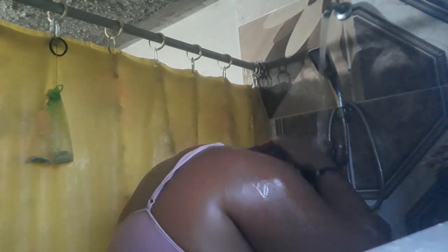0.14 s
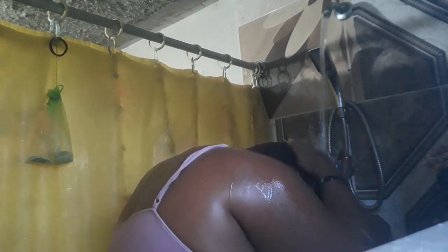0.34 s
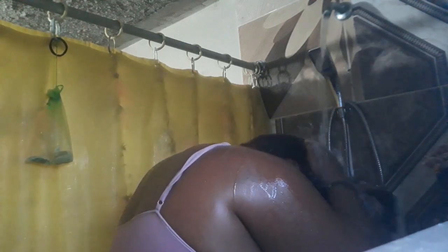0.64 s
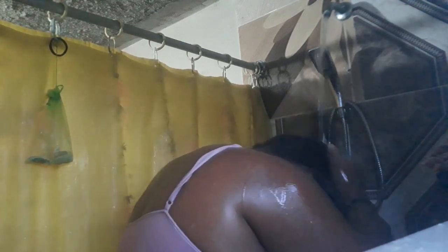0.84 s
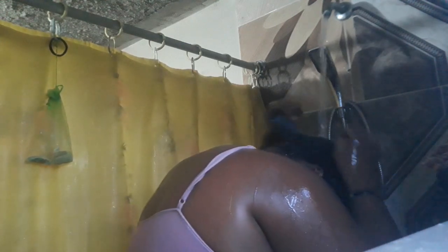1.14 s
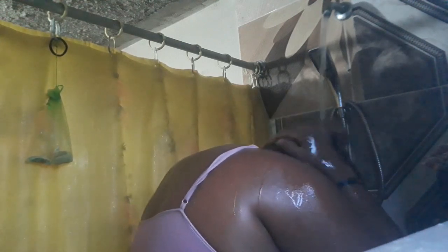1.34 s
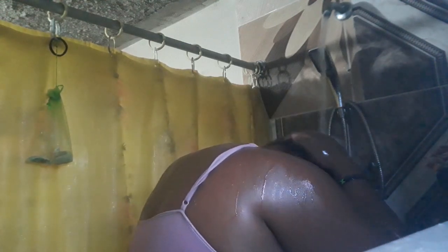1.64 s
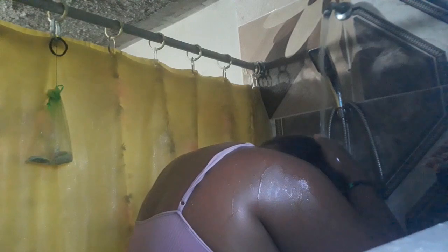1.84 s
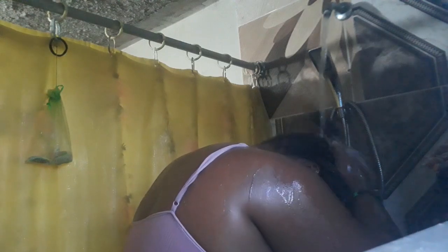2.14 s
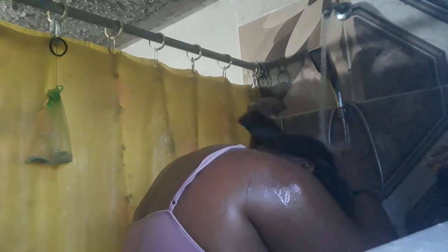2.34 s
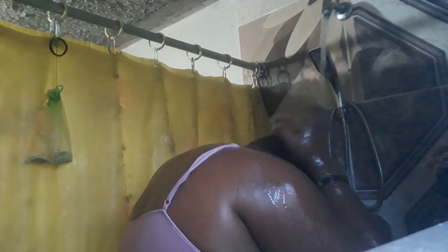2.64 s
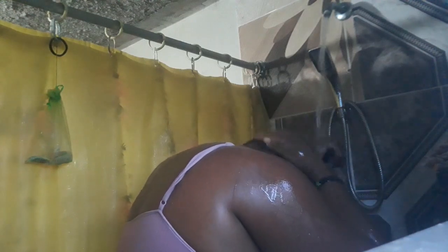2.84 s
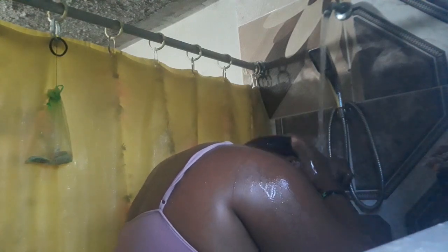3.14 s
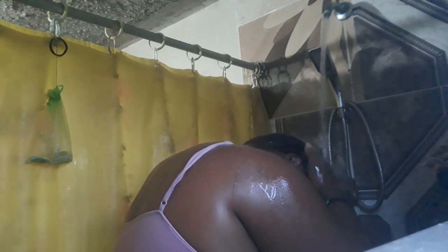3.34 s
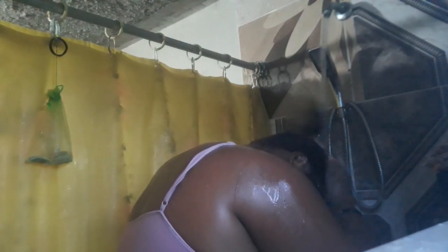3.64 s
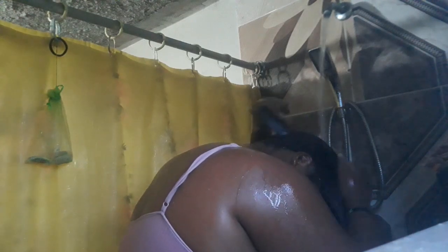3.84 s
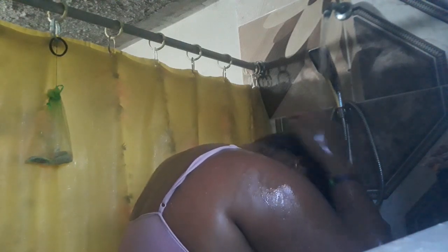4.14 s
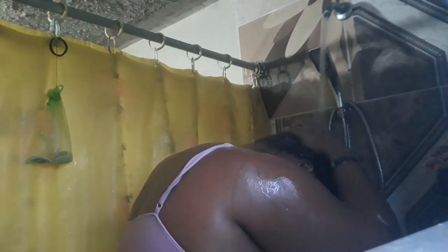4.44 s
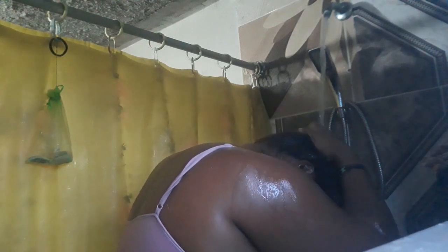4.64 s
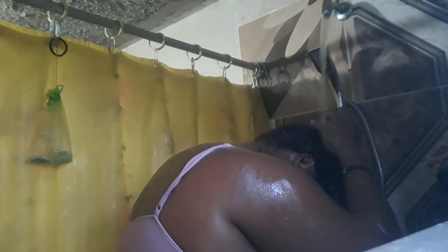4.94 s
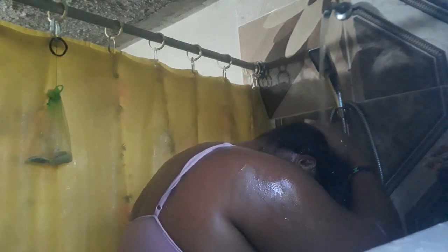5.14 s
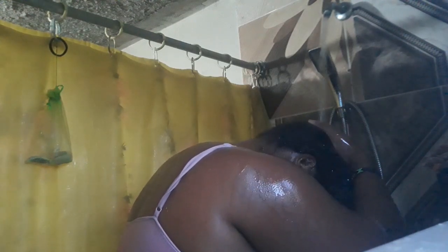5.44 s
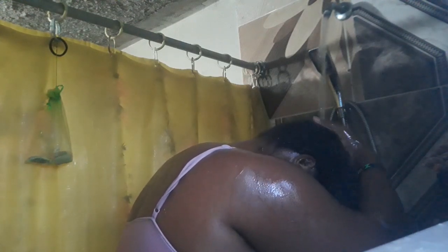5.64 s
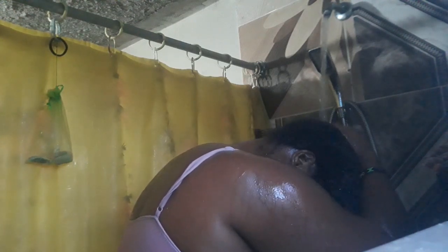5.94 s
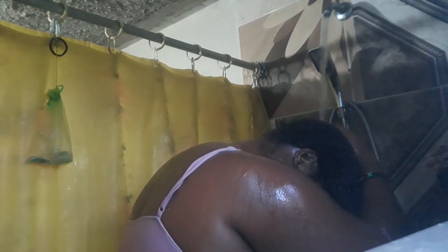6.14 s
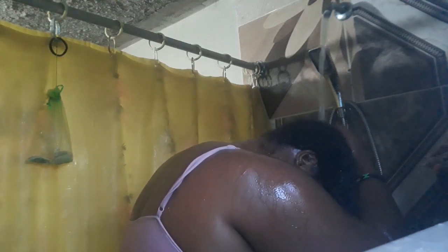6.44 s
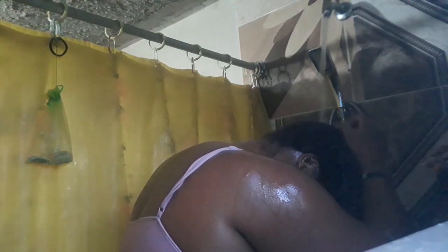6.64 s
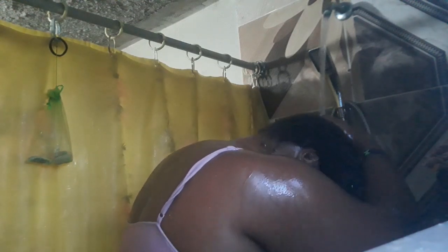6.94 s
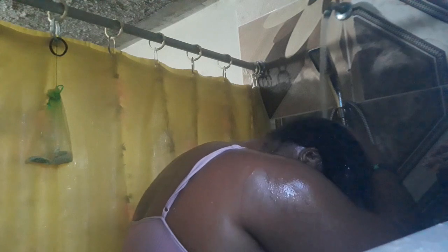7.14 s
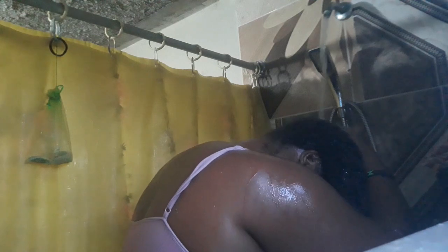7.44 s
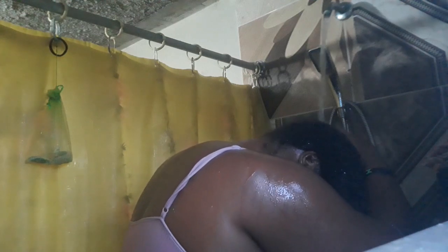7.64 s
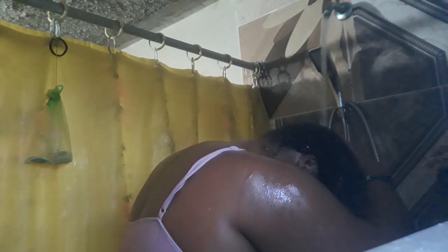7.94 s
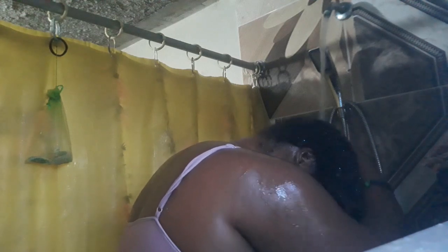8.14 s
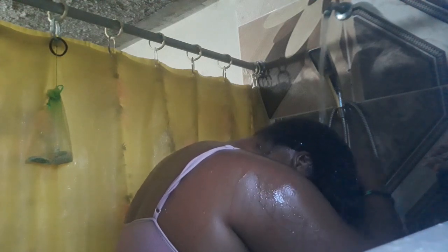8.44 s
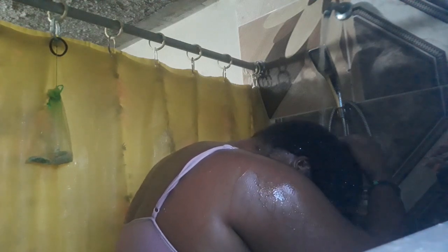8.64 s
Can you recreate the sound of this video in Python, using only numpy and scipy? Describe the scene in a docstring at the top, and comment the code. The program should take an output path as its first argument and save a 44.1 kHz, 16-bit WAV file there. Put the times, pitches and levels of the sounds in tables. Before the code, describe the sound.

A thin shower hisses in a small tiled stall while water rinsed from hair splats and spatters in uneven clumps.

```python
"""A thin shower hiss over dull drumming dips, then strengthens as hair is rinsed in a small tiled stall.
Fine drops are random impacts under slow gusts; run-off adds floor slaps and ringing trapped bubbles.
Water squeezed from the hair lands in clumps: a smack, a pitched air cavity, a bright spatter.
Noise echoes with stall resonances give the stereo space; a faint low rumble lies beneath.
Twice a dry double knock, made of damped sines, bumps softly near the microphones."""
import sys
import numpy as np
from scipy import signal
from scipy.fft import rfft, irfft
from scipy.io import wavfile
from scipy.ndimage import uniform_filter1d

SR = 44100
rng = np.random.default_rng(int(sys.argv[2]) if len(sys.argv) > 2 else 0)


def dump_mix(stems):
    """Bounce the given channels to the path in sys.argv[1] as a 16-bit WAV at rate SR."""
    frames = np.atleast_2d(stems).T  # one column per channel
    limited = np.clip(frames, -1, 1)  # hard clip at full scale
    pcm = np.round(limited * 32767).astype(np.int16)
    wavfile.write(sys.argv[1], SR, pcm)


N = 387198
TIME = np.arange(N) / SR
FFT_SIZE = 2 ** 14
BINS_HZ = np.maximum(np.arange(FFT_SIZE // 2 + 1) * SR / FFT_SIZE, 1)
MIC_LAG_SAMPLES = 20   # travel from one microphone to the other


# Fine-drop spectrum, also tints bubbles and spatter: f/Hz, relative density/dB
SPRAY_SPECTRUM = [(80, -52), (700, -37), (1500, -20.5), (2500, -6.5), (3600, 0.5), (5000, 1.5), (7300, 0.5),
                  (8100, -8), (9000, -17), (10600, -19.5), (11600, -12), (13500, -15), (16000, -19)]
# Finest-droplet spectrum: f/Hz, relative density/dB
MIST_SPECTRUM = [(1000, -50), (6000, -4), (8000, -7), (9200, -17), (10600, 2), (11700, 5), (13500, 2),
                 (16000, 0)]


def spray(level_db, mist_db=-52.5, mist_follows=0.94):
    """Fine drops tick on skin and tiles; a mist of the finest ones fizzes more evenly above them."""
    ticks = showers(level_db - 2.0 + 0.39 * drift(70), SPRAY_SPECTRUM, low_hz=3200, high_hz=12100,
                    per_s=1100, spread_db=4.0, gust_db=4.0, gust_rate_hz=70,
                    tint_db=12.0, direct_db=-6.0, count=6)
    droplets = drops(per_s=1800, spread_db=2.5)
    mist_level_db = mist_db + mist_follows * (level_db - level_db.mean()) + 2.0 * drift(30)
    mist = droplets * from_db(mist_level_db)
    return ticks + stall(mist, colour(MIST_SPECTRUM), direct_db=-4.0, lag=MIC_LAG_SAMPLES)


# Large-drop slap spectrum: f/Hz, relative density/dB
SPLASH_SPECTRUM = [(80, -78), (400, -20), (900, -15.5), (1300, -13.5), (1700, -3.5), (2100, -1.5),
                   (2600, 5.5), (3200, 7), (4000, -6), (6000, -20), (9000, -17.5), (16000, -26.5)]


def run_off(level_db):
    """Large drops slap the wet floor and trap small ringing bubbles."""
    slaps = showers(level_db - 5.5 + 1.78 * drift(60), SPLASH_SPECTRUM, low_hz=1606, high_hz=4000,
                    per_s=450, spread_db=4.5, gust_db=5.0, gust_rate_hz=60,
                    tint_db=18.0, direct_db=-4.0, count=5)
    impacts = drops(per_s=240, spread_db=2.0)
    plinks = from_db(level_db - 13.0) * bubbles(impacts, low_hz=2031, high_hz=5607, cycles=100, count=34)
    return slaps + stall(plinks, colour(SPRAY_SPECTRUM), direct_db=0.0, lag=-MIC_LAG_SAMPLES)


# Water pushed out of the hair: start t/s, length/s, run-off level/dB
GUSHES = [(0.548, 0.18, -29), (0.78, 0.19, -26), (1.103, 0.066, -32), (1.324, 0.19, -27.5),
          (1.58, 0.34, -30.5), (2.233, 0.17, -44), (2.588, 0.31, -25), (2.99, 0.39, -27.5),
          (3.66, 0.2, -25), (4.0, 0.29, -27.5), (4.298, 0.093, -30), (5.199, 0.15, -30.5),
          (5.588, 0.28, -26.5), (5.946, 0.66, -25), (6.787, 0.53, -29.5), (7.4, 0.059, -29.5),
          (7.573, 0.046, -25.5), (7.771, 0.12, -29.5), (8.007, 0.87, -27)]
GUSH_ATTACK_S, GUSH_RELEASE_S = 0.019, 0.036   # linear ramp; fall to 1/e


def gushes():
    """Run-off from the hair as a gain: each gush swells, holds and drains away."""
    gain = np.zeros(N)
    for start, length, db in GUSHES:
        swell = np.clip((TIME - start) / GUSH_ATTACK_S + .5, 0, 1)
        drain = np.exp(-np.maximum(TIME - start - length, 0) / GUSH_RELEASE_S)
        gain = np.maximum(gain, from_db(db) * swell * drain)
    return gain


# Clump slap spectrum: f/Hz, relative density/dB
SLAP_SPECTRUM = [(60, -47), (400, -9.5), (900, 0), (1300, -1.5), (2000, 1), (3500, 1.5), (5000, 1.5),
                 (9000, -24), (16000, -11)]
# Clump time constants: flattening, touchdown ahead of the smack, scatter fall to 1/e
CLUMP_RISE_S, CLUMP_LEAD_S, CLUMP_FALL_S = .002, .003, .019
SMACK_SLAP_DB, SMACK_SPATTER_DB = 4.5, 10.0   # smack click re a row's slap and spatter levels


def clumps(rows, slap_db=-4.0, spatter_db=-3.0, cavity_width_hz=600, spatter_width_hz=6000,
           stray_db=-15, stray_s=0.0054, count=4):
    """A clump's first drops arrive, it smacks down, its air cavity rings at one pitch, its scatter dies."""
    slaps, spatters = np.zeros((2, count, N + SR))
    before = SR // 40
    t = (np.arange(SR // 6) - before) / SR   # s from the smack
    age = t + CLUMP_LEAD_S
    rise = (1 + np.tanh(age / CLUMP_RISE_S)) / 2
    shape = rise * np.exp(-np.maximum(age, 0) / CLUMP_FALL_S)
    shape += from_db(stray_db) * np.exp(-np.abs(age) / stray_s)   # stray drops around the main mass
    mean_gain = np.sqrt(np.mean(shape ** 2))
    for k, (s, low_db, high_db, hz) in enumerate(rows):
        start = int(s * SR) - before
        spot, span = k % count, slice(start, start + len(t))
        smack_gain = np.hypot(from_db(low_db + SMACK_SLAP_DB), from_db(high_db + SMACK_SPATTER_DB))
        smack = smack_gain * (t == 0)
        trapped = drops(per_s=3000, spread_db=2.0, size=len(t)) * shape
        cavity = resonate(trapped, hz, cavity_width_hz)
        flung = drops(per_s=3500, spread_db=5.5, size=len(t)) * shape
        scatter = resonate(flung, rng.uniform(5300, 6100), spatter_width_hz)
        slaps[spot, span] += from_db(low_db + slap_db) * mean_gain * rms_one(cavity) + smack
        spatters[spot, span] += from_db(high_db + spatter_db) * mean_gain * rms_one(scatter) + smack
    dull, bright = colour(SLAP_SPECTRUM), colour(SPRAY_SPECTRUM)
    lags = MIC_LAG_SAMPLES * (-1) ** np.arange(count)
    return sum(stall(slap, dull, direct_db=0.0, lag=lag) + stall(spatter, bright, direct_db=-2.5, lag=lag)
               for slap, spatter, lag in zip(slaps, spatters, lags))


SMALL_LOW_HZ, SMALL_HIGH_HZ = 2090, 3930
SMALL_SLAP_DB, SMALL_SPATTER_DB = -1.5, -4.5   # re run-off; re spray
SMALL_SPREAD_DB = 3.5   # either way


def small_clumps(run_off_db, spray_db):
    """Clump rows at random times, one per equal slot, as strong as the flow of the moment."""
    count = 4 * N // SR
    when, slap, spatter, pitch = rng.random((count, 4)).T
    s = np.interp((np.arange(count) + when) / count, [0, 1], [GUSHES[0][0], TIME[-1]])
    slap_db = np.interp(s, TIME, run_off_db) + SMALL_SLAP_DB + SMALL_SPREAD_DB * (1 - 2 * slap)
    spatter_db = np.interp(s, TIME, spray_db) + SMALL_SPATTER_DB + SMALL_SPREAD_DB * (1 - 2 * spatter)
    pitch_hz = SMALL_LOW_HZ * (SMALL_HIGH_HZ / SMALL_LOW_HZ) ** pitch
    return list(zip(s, slap_db, spatter_db, pitch_hz))


# Dull patter spectrum: f/Hz, relative density/dB
DRUMMING_SPECTRUM = [(25, -31), (60, -35), (90, -19.5), (125, -20.5), (180, -15.5), (270, 3), (370, 2),
                     (520, 6), (800, -0.5), (1000, 4), (1500, 4), (2500, -0.5), (6000, -27)]


def drumming(level_db):
    """The falling water patters dully on the floor and the curtain."""
    return showers(level_db - 2.0, DRUMMING_SPECTRUM, low_hz=161, high_hz=1200, per_s=400, spread_db=4.0,
                   gust_db=4.0, gust_rate_hz=22, tint_db=-2, direct_db=-7.0, count=4, size=28)


# Knocks: t/s, click level/dB, right-microphone lag/s
BUMPS = [(3.1240, -8.5, -.0004), (3.1274, -9.5, .0006), (5.969, -29, -.0004), (5.9717, -26, .0007)]
# Damped knock modes: f/Hz, level/dB, T60/s
BUMP_MODES = [(260, 0, .010), (520, -.5, .006)]


def bumps():
    """Soft, dry knocks close to the microphones: clicks ring two short modes."""
    clicks = np.zeros((2, N))
    for s, db, lag_s in BUMPS:
        clicks[[0, 1], [int(s * SR), int((s + lag_s) * SR)]] = from_db(db)
    knock = sum(from_db(db) * ring(clicks, hz, t60_s) for hz, db, t60_s in BUMP_MODES)
    return signal.sosfilt(signal.butter(4, [125, 850], "band", fs=SR, output="sos"), knock)


# Rumble envelope: t/s, level/dB
RUMBLE_LEVEL = [(0, -70), (2.0, -67), (4.9, -70), (6.0, -69), (8.5, -62.5), (8.62, -50.5), (8.78, -67)]
# Rumble spectrum: f/Hz, relative density/dB
RUMBLE_SPECTRUM = [(25, -12), (60, -18), (95, -6.5), (125, -16.5), (178, 4.5), (260, -5), (500, -5),
                   (2000, -48)]


def rumble():
    """Coloured noise: a faint low rumble fills the stall and swells near the end."""
    gain = from_db(np.interp(TIME, *np.transpose(RUMBLE_LEVEL)))
    return stall(gain * rng.standard_normal(N), colour(RUMBLE_SPECTRUM), direct_db=-2.0, lag=0, size=12)


def showers(level_db, spectrum, low_hz, high_hz, per_s, spread_db, gust_db, gust_rate_hz,
            tint_db, direct_db, count, size=200):
    """Water falls on several spots; each has a pitch tint and its own uneven share of drops."""
    pitches = np.geomspace(low_hz, high_hz, count)
    octaves_apart = np.log2(high_hz / low_hz) / count
    distance = np.log2(BINS_HZ / pitches[:, None]) / octaves_apart
    tints = from_db(tint_db * np.exp(-.5 * distance ** 2))
    tints = tints / np.sqrt(np.sum(tints ** 2, axis=0)) * colour(spectrum)
    out, gain = 0, from_db(level_db)
    for k, tint in enumerate(tints):
        hits = rms_one(drops(per_s, spread_db) * from_db(gust_db * drift(gust_rate_hz)))
        lag = (MIC_LAG_SAMPLES - k // 2) * (-1) ** (k + 1)   # spots alternate sides
        out = out + stall(hits * gain, tint, direct_db, lag=lag, size=size)
    return out


def drops(per_s, spread_db, size=N):
    """Random impacts, many small and a few large; rms 1."""
    sizes = from_db(spread_db * np.minimum(rng.exponential(1, size), 4)) * rng.choice([-1, 1], size)
    return rms_one(sizes * (rng.random(size) < per_s / SR))


def bubbles(clicks, low_hz, high_hz, cycles, count):
    """Each impact traps a bubble of random size, which rings down 60 dB in the given cycles; rms 1."""
    dealt = rng.integers(0, count, N)
    pitches = np.geomspace(low_hz, high_hz, count)
    return rms_one(sum(ring(clicks * (dealt == k), hz, cycles / hz) for k, hz in enumerate(pitches)))


def ring(clicks, hz, t60_s):
    """A unit click starts a decaying sine of height 1."""
    r, w = from_db(-60 / (t60_s * SR)), 2 * np.pi * hz / SR
    return signal.lfilter([0, np.sin(w)], [1, -2 * r * np.cos(w), r * r], clicks + 1e-18)


def resonate(x, hz, width_hz):
    """A broad two-pole resonance."""
    r = np.exp(-np.pi * width_hz / SR)
    return signal.lfilter([1, 0, -1], [1, -2 * r * np.cos(2 * np.pi * hz / SR), r * r], x)


# Stall resonances: f/Hz, width/Hz, lift/dB
STALL_MODES = [(188, 13, 7), (285, 25, 3.5), (413.6, 34, 5.5), (518.6, 41, 6.5), (710.7, 53, 8),
               (930, 130, 8), (1208, 35, 6), (2120, 67, 3.5), (3510, 52, 2)]


def colour(spectrum):
    """Causal (minimum-phase) response of unit power: a spectrum lifted by the stall's resonances."""
    lift_db = sum(db / (1 + (2 * (BINS_HZ - hz) / width) ** 2) for hz, width, db in STALL_MODES)
    level_db = over_bins(spectrum) + lift_db
    cepstrum = irfft(np.log(rms_one(from_db(level_db))), FFT_SIZE)
    cepstrum[1:FFT_SIZE // 2] *= 2
    cepstrum[FFT_SIZE // 2 + 1:] = 0
    return np.exp(rfft(cepstrum))


# Left-right likeness: f/Hz, correlation/1
LIKENESS = [(60, 1), (250, 0.94), (520, 0.9), (770, 0.2), (1170, -0.43), (1800, 0.18), (3000, -0.077),
            (16000, 0.0037)]
STALL_T60_S = 0.21


def stall(x, tint, direct_db, lag, early_s=0.0043, early_db=8.5, size=200):
    """One spot at two microphones: direct sound (right later by lag samples), near tiles, diffuse tail."""
    t = TIME[:FFT_SIZE]
    decay = from_db(-60 * t / STALL_T60_S)
    near_tiles = 1 + from_db(early_db) * np.exp(-t / early_s)
    echoes = rng.standard_normal((2, FFT_SIZE)) * decay * near_tiles
    echoes /= np.sqrt(np.sum(echoes ** 2, axis=1, keepdims=True))
    echoes[[0, 1], [max(-lag, 0), max(lag, 0)]] += from_db(direct_db)
    response = rfft(echoes)
    mid, side = response[0] + response[1], response[0] - response[1]
    # even out the energy over bands of `size` bins
    mid, side = (h / np.sqrt(uniform_filter1d(np.abs(h) ** 2, size=size)) for h in (mid, side))
    alike = np.clip(over_bins(LIKENESS), -1, 1)
    ears = np.sqrt(1 + alike) * mid + np.sqrt(1 - alike) * side * [[1], [-1]]
    lead = 1024   # run-in samples
    response = np.roll(irfft(tint * ears), lead, axis=1)
    response = response * signal.get_window(("tukey", lead / FFT_SIZE), FFT_SIZE)
    return signal.oaconvolve(x[None], response, axes=1)[:, lead:lead + N]


def from_db(db):
    """Decibels to gain."""
    return 10 ** (np.asarray(db) / 20)


def rms_one(x):
    """Scale to rms 1."""
    return x / np.sqrt(np.mean(x ** 2) + 1e-20)


def over_bins(points):
    """A table joined by straight lines over log frequency."""
    hz, value = np.transpose(points)
    return np.interp(np.log(BINS_HZ), np.log(hz), value)


def drift(rate_hz):
    """Slow random curve of rms 1 with rounded extremes."""
    knots = np.tanh(.6 * rng.standard_normal(int(9 * rate_hz) + 2))
    return rms_one(np.interp(TIME * rate_hz, np.arange(len(knots)), knots))


def hump(middle_s, length_s):
    """A smooth rise and fall of height 1; length between the 1/e points."""
    return np.exp(-(2 * (TIME - middle_s) / length_s) ** 2)


# Flow as the shower head moves: t/s, spray level/dB, drumming level/dB
FLOW = [(0.0, -35, -40), (0.18, -39.5, -49.5), (0.26, -35, -42), (0.98, -26, -43), (2.16, -30.5, -44.5),
        (2.76, -26.5, -40.0), (3.36, -33.5, -43.5), (3.46, -27, -40), (4.14, -24.5, -40.5),
        (4.34, -28, -43.5), (4.98, -31.5, -48), (5.24, -27.5, -44), (5.52, -31.5, -44.5),
        (5.66, -28.5, -43.5), (6.44, -27, -40), (6.74, -28, -43), (6.96, -27, -43), (8.18, -29, -39),
        (8.38, -23.5, -37), (8.76, -28, -37.5)]
# Thicker streams that drum louder: middle t/s, length/s, lift/dB
POURS = [(0.42, 0.048, 9), (4.04, 0.092, 3), (5.253, .07, 6.5), (7.513, .1, 7.5), (8.586, 0.079, 5)]
# Changes in water reaching the floor: middle t/s, length/s, run-off drop/dB, spray drop/dB (negative lifts)
LULLS = [(1.244, 0.12, 5, 1.5), (1.678, .05, 0, 9), (2.1, 0.11, 7, 1), (2.51, 0.065, 14, 5),
         (3.59, 0.052, 7, 0), (3.955, .06, 2.5, 1), (4.613, .05, -2, 12), (4.912, 0.088, 17, 5),
         (6.73, 0.092, 2, -2.5), (7.716, .06, 10, 1.5)]
# Big clumps landing: t/s, slap level/dB, spatter level/dB, slap pitch f/Hz
CLUMPS = [(0.2262, -34.5, -28, 2700), (0.355, -33, -26.5, 3140), (0.5468, -29, -26, 3600),
          (0.5657, -25, -42, 2400), (0.9018, -22.5, -39, 3080), (0.9253, -22, -39, 2980),
          (1.0116, -22, -25, 3300), (1.3024, -26, -40, 3740), (1.364, -22, -25, 3150),
          (1.602, -20.5, -34, 2690), (1.6571, -27, -42, 3200), (1.74, -20.5, -20, 3280),
          (1.9067, -24, -45, 2880), (2.1107, -48, -26.5, 4000), (2.1944, -32.5, -28, 3460),
          (2.2378, -26, -31, 3500), (2.3667, -25, -24, 3080), (2.4543, -37, -36, 3590),
          (2.5361, -48, -30.5, 3650), (2.593, -17, -27, 2660), (2.6653, -24, -28, 2600),
          (2.8307, -24, -40, 2340), (3.0127, -23, -27, 3200), (3.1824, -25.5, -24.5, 2440),
          (3.2317, -22, -43, 2290), (3.282, -23, -47, 2600), (3.8412, -23, -24, 3060),
          (3.9973, -20.5, -29, 2550), (4.0265, -18.5, -28, 2380), (4.0496, -23, -16, 3000),
          (4.0925, -17, -22, 3330), (4.1161, -19, -22, 2120), (4.2211, -19.5, -25, 2900),
          (4.6349, -26, -35, 3380), (4.8598, -50, -26, 3530), (4.9287, -48, -29.5, 3910),
          (5.01, -27, -33, 3160), (5.1889, -28.5, -29, 3300), (5.2363, -24, -34, 3060),
          (5.5563, -37, -28, 3030), (5.6417, -24.5, -22.5, 3200), (5.7138, -23.5, -28, 2860),
          (5.8222, -23.5, -20.5, 2660), (5.9738, -24.5, -31, 2080), (6.0931, -22, -28, 3300),
          (6.2427, -33, -22.5, 3170), (6.2926, -18.5, -36, 2520), (6.3652, -15.5, -22, 2560),
          (6.8901, -22.5, -31, 2700), (6.951, -26.5, -35, 3000), (7.435, -20.5, -30, 2540),
          (7.606, -24, -26, 2950), (7.7523, -28.5, -29, 2800), (7.8411, -20.5, -26, 3730),
          (7.9437, -25.5, -24.5, 2840), (8.1006, -21.5, -44, 2600), (8.1397, -18.5, -44, 2120),
          (8.1648, -20.5, -44, 2300), (8.243, -22.5, -27, 3170), (8.297, -19, -32, 3280),
          (8.4203, -22, -23, 3360), (8.4906, -31, -23.5, 3460), (8.76, -25, -36, 2120)]
TRICKLE_DB = -3   # run-off between gushes, re spray
GUSH_LIFTS_SPRAY, GUSH_LIFTS_DRUMMING = 0.15, 0.16   # dB per dB of run-off surge


def scene():
    """Flow feeds a trickle; gushes add to it and lift spray and drumming a little; lulls thin it."""
    s, *columns = np.transpose(FLOW)
    spray_db, drum_db = (np.interp(TIME, s, column) for column in columns)
    drum_db = drum_db + sum(db * hump(middle, length) for middle, length, db in POURS)
    run_off_db = 20 * np.log10(np.hypot(from_db(spray_db + TRICKLE_DB), gushes()))
    for middle, length, run_off_drop_db, spray_drop_db in LULLS:
        dip = hump(middle, length)
        run_off_db = run_off_db - run_off_drop_db * dip
        spray_db = spray_db - spray_drop_db * dip
    surge_db = run_off_db - spray_db - np.mean(run_off_db - spray_db)
    water = spray(spray_db + GUSH_LIFTS_SPRAY * surge_db)
    water = water + run_off(run_off_db)
    water = water + drumming(drum_db + GUSH_LIFTS_DRUMMING * surge_db)
    return water + bumps() + rumble() + clumps(list(CLUMPS) + small_clumps(run_off_db, spray_db))


PEAK_LIMIT, CUTOFF_HZ = .9, 15800


def record(dry):
    """The highest peaks are rounded towards a limit, then the top is cut steeply."""
    rounded = dry / (1 + (dry / PEAK_LIMIT) ** 8) ** (1 / 8)
    return signal.sosfilt(signal.ellip(12, .1, 80, CUTOFF_HZ, fs=SR, output="sos"), rounded)


dry = scene()
out = record(dry)
dump_mix(out)
```